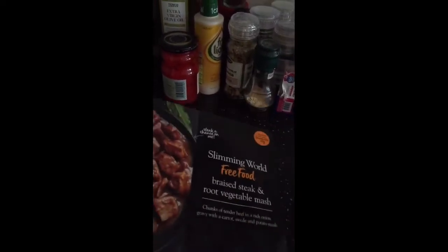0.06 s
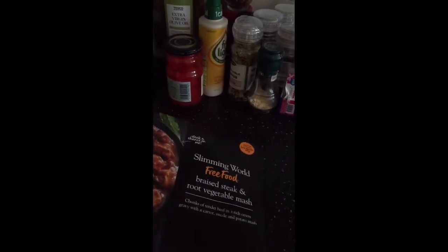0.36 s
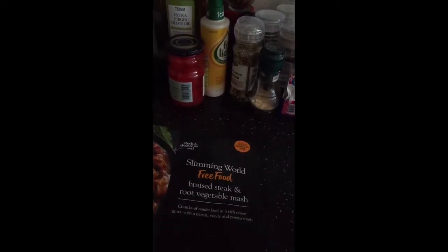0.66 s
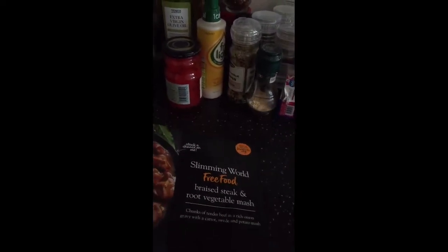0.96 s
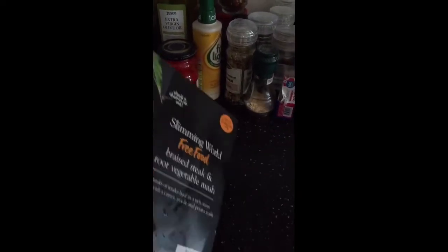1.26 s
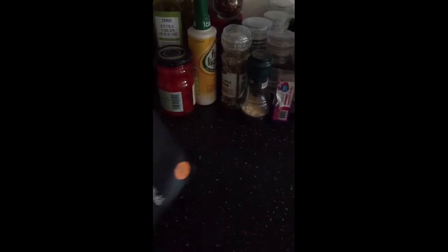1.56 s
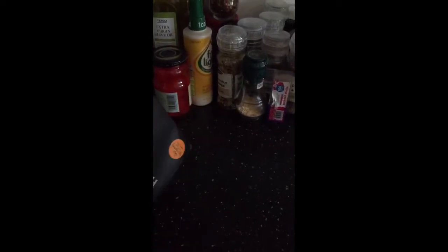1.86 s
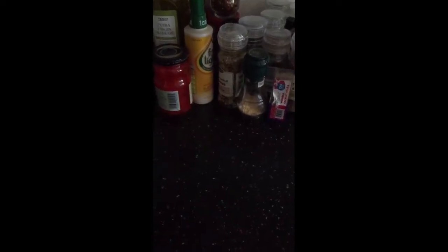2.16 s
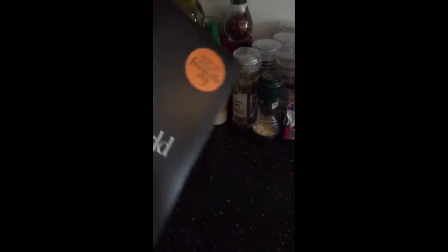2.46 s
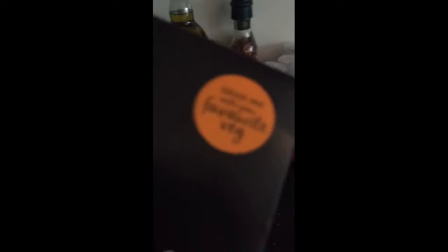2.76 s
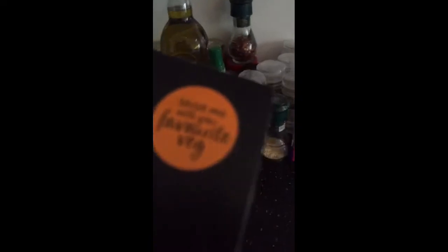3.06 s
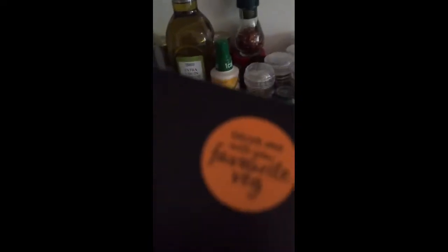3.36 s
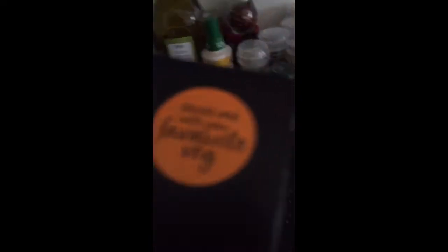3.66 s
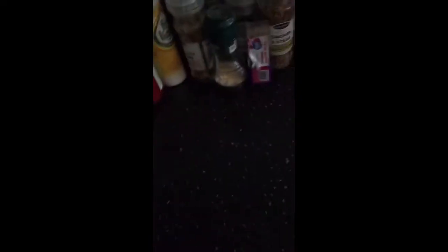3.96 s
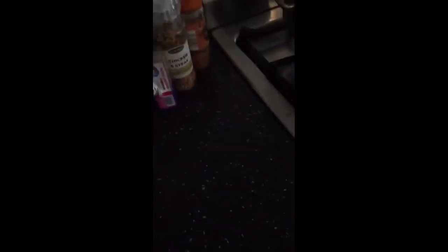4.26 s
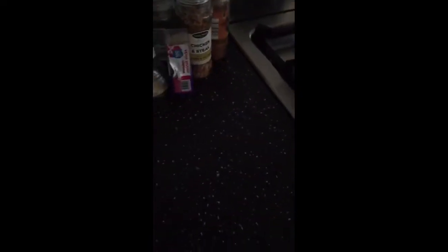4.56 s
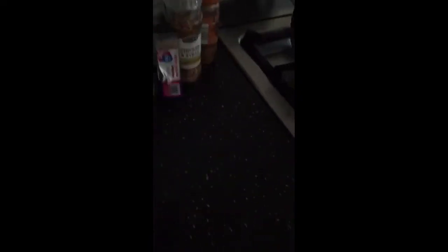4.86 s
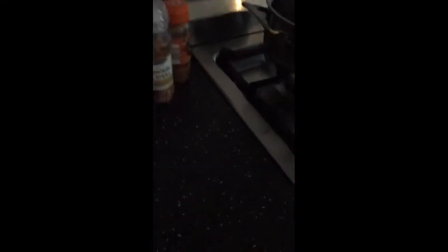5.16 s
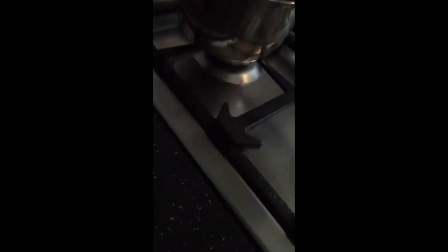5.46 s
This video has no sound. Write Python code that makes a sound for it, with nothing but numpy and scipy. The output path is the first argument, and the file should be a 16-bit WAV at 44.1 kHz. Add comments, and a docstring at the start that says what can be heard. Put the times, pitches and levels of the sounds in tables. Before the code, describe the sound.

Fingers rub and turn a ready meal in its cardboard sleeve, close to the microphone in a small kitchen. The card rustles softly while the plastic tray gives sharp snaps and crinkles. Clusters of light knocks and soft, hollow thuds follow as the box shifts in the hand. After a brief lull, the tray slides from the sleeve in one hissing scrape, with a few small bumps.

```python
"""Fingers rub and turn a ready meal in its cardboard sleeve, close by in a small kitchen.
The card catches and slips in tiny steps, which makes it rustle. Creases in the plastic tray
flip with a snap, tray and fingers knock on the card, and the box thuds softly in the hand.
At the end the packaging slides in one long hissing stroke. Short echoes and faint air lie behind."""
import sys
import numpy as np
from scipy import signal
from scipy.fft import rfft, irfft
from scipy.io import wavfile
from scipy.ndimage import map_coordinates

SR = 44100
rng = np.random.default_rng(int(sys.argv[2]) if len(sys.argv) > 2 else 0)


def store_pcm(level_fs):
    """Save levels as 16-bit WAV."""
    pcm = np.round(np.clip(level_fs, -1, 1) * 32767).astype(np.int16)
    wavfile.write(sys.argv[1], SR, np.atleast_2d(pcm).T)


N = 243431
T = np.arange(SR // 4) / SR   # seconds since a contact
HOLD_START_S, HOLD_LENGTH_S = 0.046, 3.954   # while the hand grips the box


# Finger strokes: t/s, length/s, rise time/s, level/dB, extra for hollow/dB, extra for grit/dB
FINGER_STROKES = [(0.035, 0.023, 0.014, -61, 6.5, -14), (0.188, 0.11, 0.022, -55.5, -4, -4.5),
                  (0.342, 0.043, 0.0073, -42, -10.5, -10), (0.401, 0.05, 0.0099, -45.5, -8, 3.5),
                  (0.524, 0.069, 0.047, -44, -2, 1), (0.455, 0.36, 0.045, -53.5, -10.5, 7),
                  (0.727, 0.041, 0.036, -38, -33, -7), (0.798, 0.093, 0.011, -56, -4.5, -1.5),
                  (0.953, 0.278, 0.23, -55, -6.5, -6), (1.631, 0.048, 0.024, -46, -3.5, 0.5),
                  (1.681, 0.043, 0.01, -55, -4, -6.5), (1.755, 0.098, 0.003, -56.5, -15, -3.5),
                  (1.877, 0.11, 0.031, -43, -0.5, -2), (2.004, 0.13, 0.009, -52.5, -11, -5),
                  (2.13, 0.034, 0.0037, -42, 3.5, -2), (2.169, 0.08, 0.02, -46.5, -6, -1.5),
                  (2.281, 0.042, 0.014, -46, 0.5, -5), (2.318, 0.093, 0.0045, -59, -3, -3.5),
                  (2.527, 0.065, 0.02, -58, -7.5, -14), (2.684, 0.3, 0.019, -80.5, -7, 7),
                  (3.092, 0.041, 0.031, -51, 14.5, -3), (3.21, 0.051, 0.0013, -43.5, 2.5, -4.5),
                  (3.166, 0.31, 0.011, -57, 6.5, -22), (3.459, 0.15, 0.029, -55.5, -1, -14),
                  (3.791, 0.2, 0.026, -69.5, 3, 9), (5.265, .11, .01, -63.5, 1.5, -2.5),
                  (5.376, 0.075, 0.035, -59, -4.5, -5)]

def rub_gains(grip_db=-72):
    """How hard the grip and the strokes drive the card, the hollow box and the gritty surface."""
    grip = from_db(grip_db) * stroke(HOLD_START_S, HOLD_LENGTH_S, attack_s=0.015)
    power = np.outer([1, 1, 0], grip ** 2)   # the grip alone stirs no grit
    for s, length_s, attack_s, db, hollow_db, grit_db in FINGER_STROKES:
        gains = from_db([db, db + hollow_db, db + grit_db])
        power += np.outer(gains ** 2, stroke(s, length_s, attack_s) ** 2)
    return np.sqrt(power)


# Tone of the card's flat panels, the hollow box and the gritty surface: f/Hz, level/dB
CARD_TONE = [(400, -28), (700, -15), (980, 6), (1150, -1.5), (1380, -1.5), (1700, -0.5), (2100, 0),
             (2600, -7.5), (3800, -12), (5200, -20.5), (15000, -49)]
HOLLOW_TONE = [(35, -35), (70, 4.5), (140, -4), (280, -1.5), (400, -6.5), (550, -6), (750, -2.5),
               (1200, -35.5), (3000, -53.5)]
GRIT_TONE = [(1000, -5.5), (2500, 10.5), (4200, 5), (6000, 3.5), (7500, -1.5), (10500, -4.5), (13000, -3),
             (16000, -9.5)]

def rubbing(card, hollow, grit):
    """Fingers and tray drag on the card, which sounds through its panels, hollow and rough face."""
    drag = slips(per_s=1700, spread_db=3.8, clump_db=2.6, clumps_per_s=110, smooth=.7)
    flex = slips(per_s=600, spread_db=3, clump_db=3, clumps_per_s=50, smooth=.6)
    panels = from_db(3) * card * colour(drag, CARD_TONE)
    return panels + hollow * colour(flex, HOLLOW_TONE) + grit * colour(drag, GRIT_TONE)


def lifted(x, start_s=0.5, length_s=0.95, bass_hz=130):
    """The bass of the rubbing comes in as the box leaves the worktop."""
    free = np.clip((np.arange(N) / SR - start_s) / length_s, 0, 1)
    resting = signal.lfilter(*signal.butter(2, bass_hz, "high", fs=SR), x)
    return free * x + (1 - free) * resting


# Sharp snaps, mostly creases of the tray flipping, some the crack of a knock on the card: t/s, level/dB, f/Hz,
# crumple (0 a clean flip, 1 a crunch)
SNAPS = [(0.208, -39, 6100, 0.27), (0.391, -33, 12600, 0.13), (0.436, -19.5, 2700, 0.77),
         (0.4696, -9.5, 11800, 0.045), (0.521, -35, 4400, .2), (0.5353, -21.5, 11300, 0.11),
         (.5750, -2, 3510, 0.081), (0.5837, -16.5, 12200, 0.19), (0.769, -25, 6150, .2),
         (0.8303, -25.5, 4430, 0.21), (1.054, -39.5, 2560, .3), (1.297, -40, 8800, 0.11),
         (1.8007, -23.5, 6900, 0.14), (1.953, -18.5, 2960, .15), (2.1195, -31, 5460, 0.088),
         (2.135, -28.5, 2200, .15), (2.2583, -19, 2260, 0.081), (2.778, -45.5, 3500, 0.71),
         (2.9513, -37, 2900, .25), (3.116, -30, 5750, 0.19), (3.1302, -22, 4070, 0.091),
         (3.2806, -25, 3100, 0.062), (3.419, -36, 2970, 0.098), (3.9852, -40.5, 5500, .5),
         (4.773, -34, 2480, 0.26)]

def snaps(creases, scatter_s=0.0052, ring_cycles=4.5):
    """A crease flips in one pulse, then crumples in small steps; the thin sheet rings lower."""
    out = np.zeros(N)
    for s, db, hz, crumple in creases:
        force = (T == 0) + crumple * rng.standard_normal(len(T)) * np.exp(-T / scatter_s)
        force = cut(force, "low", hz * 1.52)   # a larger crease takes longer to flip
        flip = np.diff(force, prepend=0)
        crease = ring(flip, min(hz, 15000), fade_s=ring_cycles / hz)
        sheet = from_db(-9) * ring(flip, hz * .6, fade_s=0.0021)
        pulse = cut(crease + sheet, "low", hz * 8.1 * from_db(0.26 * db))   # weak snaps are duller
        add(out, s, from_db(db) * peak_one(pulse))
    return out


def crinkles(grit, per_s=4.6, over_grit_db=16, middle_hz=5000, crumple=0.28):
    """List small snaps at random moments, as strong as the rubbing that sets them off."""
    count = round(per_s * HOLD_LENGTH_S)
    s = HOLD_START_S + HOLD_LENGTH_S * rng.random(count)
    db = 20 * np.log10(grit[(s * SR).astype(int)] + 1e-9) + over_grit_db
    hz = middle_hz * 2 ** rng.uniform(-1, 1, count)
    return list(zip(s, db, hz, np.full(count, crumple)))


def jolts(middle_hz=1310, rattle_s=0.00081, thump_db=-21):
    """List a light knock for each snap; the card gives way, so it grows less than the snap."""
    return [(s, -32.5 + 0.35 * db, middle_hz * 2 ** rng.uniform(-.25, .25), rattle_s, thump_db)
            for s, db, _, _ in SNAPS]


# Tray and fingers hit the card: t/s, level/dB, f/Hz, rattle time/s, extra for the box's thump/dB
CARD_KNOCKS = [(0.034, -41, 1040, 0.0023, -0.5), (0.788, -40, 1110, 0.00088, -19),
               (1.168, -41, 1125, 0.0076, -27), (1.446, -44, 1375, 0.0074, -13),
               (1.651, -34.5, 1006, 0.0024, 4), (1.956, -21, 1210, 0.0065, -3),
               (2.033, -23, 1160, 0.00066, -35), (2.1020, -34.5, 1056, 0.0074, -1),
               (2.1465, -21, 1224, 0.004, -9.5), (2.1692, -19.5, 1144, 0.0028, -13),
               (2.2235, -27, 1080, 0.002, -3), (2.258, -23, 1440, 0.00094, -26),
               (2.616, -41, 1740, 0.00049, -45), (2.704, -44.5, 1533, 0.003, -13),
               (3.119, -30.5, 1190, 0.0024, -5.5), (3.133, -24.5, 1535, 0.0026, -2.5),
               (3.281, -29, 915, 0.001, -10), (3.831, -46.5, 1393, 0.003, -6),
               (3.990, -35, 835, 0.0033, -11), (4.711, -48.5, 1000, 0.0022, 0.5),
               (4.7755, -29, 897, 0.0068, -13.5), (4.821, -37.5, 940, 0.0051, -15),
               (5.235, -32.5, 1234, 0.0058, -35)]
# Notes of a card panel: multiple of the knock's pitch, level/dB, time to fade by 60 dB/s
PANEL_NOTES = [(.8, -3.5, 0.031), (0.998, 3, .021), (1.18, 0.5, 0.012), (1.38, -6, 0.016),
               (1.898, -9, 0.013), (2.499, -10, 0.0093)]

def knocks(blows, lead_s=.02, rattle=0.29, detune=.03, uneven_db=1.5):
    """Surfaces scuff, hit and rattle; the grip shifts the panel's notes from blow to blow."""
    out, t = np.zeros(N), T - lead_s
    for s, db, hz, rattle_s, _ in blows:
        force = rattle * rng.standard_normal(len(t)) * np.exp(-abs(t) / rattle_s)
        force[round(lead_s * SR)] += 1   # the hit itself
        panel = 0
        for ratio, level, fade_s in PANEL_NOTES:
            note = ring(force, hz * ratio * np.exp(detune * rng.normal()), fade_s)
            panel += note * from_db(level + uneven_db * rng.normal())
        panel = cut(panel, "low", hz * 3)   # card gives way, so the contact is soft
        panel = cut(panel, "high", hz * 0.79)   # a small panel gives off little bass
        crack = from_db(-26) * peak_one(colour(force, GRIT_TONE))
        add(out, s - lead_s, from_db(db) * (peak_one(panel) + crack))
    return out


# Soft bumps of the box in the hand: t/s, level/dB, f/Hz
HAND_BUMPS = [(0.285, -39, 333), (0.392, -40.5, 292), (1.975, -36, 258), (2.15, -30, 108),
              (2.768, -30, 109), (2.93, -43.5, 105), (3.13, -24.5, 97), (3.215, -26, 88.5),
              (3.286, -33, 76.6), (3.441, -40, 110), (3.831, -35.5, 83), (3.883, -38, 125),
              (3.988, -41.5, 86.6), (4.707, -40, 98), (4.939, -36.5, 540), (5.089, -38, 158),
              (5.202, -37.5, 72), (5.295, -47.5, 80), (5.361, -41, 540), (5.39, -42, 169)]
# Notes of the whole box: multiple of the bump's pitch, level/dB, swell and fade time/cycles
BOX_NOTES = [(0.621, -4.5, 0.97), (1.001, 10, 0.49), (1.648, -3, 0.82), (2.8, -9.5, 1)]

def thuds(blows, thump_hz=276, spread_octaves=0.23):
    """Each bump or knock pushes the whole box, which swings for just a few cycles."""
    out = np.zeros(N)
    thumps = [(s, db + thump_db, thump_hz * 2 ** (spread_octaves * rng.uniform(-1, 1)))
              for s, db, _, _, thump_db in blows]
    for s, db, hz in HAND_BUMPS + thumps:
        body = 0
        for ratio, level, cycles in BOX_NOTES:
            turns = T * hz * ratio
            swell = turns / cycles * np.exp(-turns / cycles)
            body -= from_db(level) * swell * np.sin(2 * np.pi * turns)
        body = cut(body, "high", hz * 0.42)   # the light box hardly sounds below its main pitch
        add(out, s, from_db(db) * peak_one(body))
    return out


# A card edge skims along with a bright hiss: t/s, length/s, rise time/s, level/dB
EDGE_SKIMS = [(1.401, 0.031, 0.017, -54.5), (1.535, 0.031, 0.022, -60), (3.765, 0.16, 0.047, -61),
              (5.15, 0.07, 0.032, -38)]
# Tone of the slide's scrape and of its fine hiss: f/Hz, level/dB
SCRAPE_TONE = [(300, -51), (600, -7), (900, 2), (1350, 5.5), (1700, 5), (2200, 1.5), (3200, -0.5),
               (4500, -2), (7000, -12.5), (12000, -35)]
HISS_TONE = [(2000, 3.1), (4500, 4.1), (6400, 10.3), (8000, 4.9), (9100, 7.7), (9500, 11.5), (10100, 3.5),
             (12800, 7.4), (16000, 1.7)]

def sliding(start_s=4.797, length_s=0.415, speed_up_s=0.052, stop_s=0.014):
    """The tray slides until it comes free: coarse slips shake the card, fine slips and skims hiss."""
    t = np.maximum(np.arange(N) / SR - start_s, 0)
    speed = (1 - np.exp(-t / speed_up_s)) * np.exp(-np.maximum(t - length_s, 0) / stop_s)
    skims = sum(from_db(db) * stroke(s, skim_s, rise_s, stop_s) for s, skim_s, rise_s, db in EDGE_SKIMS)
    coarse = slips(per_s=5000, spread_db=2.5, clump_db=1.3, clumps_per_s=120, smooth=.9)
    fine = slips(per_s=9000, spread_db=3, clump_db=1.1, clumps_per_s=200, smooth=.9)
    scrape = from_db(-42.5) * speed * colour(coarse, SCRAPE_TONE)
    hollow = from_db(-53) * speed ** 0.5 * colour(coarse, HOLLOW_TONE)
    hiss = np.hypot(from_db(-45.5) * speed ** 5.4, skims) * colour(fine, HISS_TONE)
    return scrape + hollow + hiss


# A touch travels along a panel: t/s, length/s, level/dB, first f/Hz, last f/Hz
PANEL_SWISHES = [(0.744, 0.025, -45, 1900, 1190), (1.202, 0.018, -45, 1090, 1100),
                 (3.283, 0.033, -46, 415, 726), (4.851, 0.3, -51.5, 1180, 683),
                 (4.914, 0.237, -48.5, 2680, 1850), (5.227, 0.0098, -42.5, 2540, 2550)]

def swishes(notes=12, sharpness=17.8, attack_s=0.0089):
    """A smooth rub wakes neighbouring notes of a panel, one after another."""
    out, t = np.zeros(N), np.arange(SR // 2) / SR
    for s, length_s, db, first_hz, last_hz in PANEL_SWISHES:
        place = np.clip(t / length_s, 0, 1) * (notes - 1)
        hiss = rng.standard_normal(len(t))
        sound = 0
        for k, hz in enumerate(np.geomspace(first_hz, last_hz, notes)):
            note = rms_one(signal.lfilter(*signal.iirpeak(hz, sharpness, SR), hiss))
            sound += np.maximum(1 - abs(place - k), 0) * note
        add(out, s, from_db(db) * sound * stroke(0, length_s, attack_s)[:len(t)])
    return out


# A fingertip glides over the sleeve: t/s, length/s, level/dB, first f/Hz, last f/Hz
FINGER_GLIDES = [(0.07, 0.19, -60, 2152, 2085), (1.33, 0.058, -53.5, 2115, 2180),
                 (1.54, 0.076, -50.5, 2066, 2144), (3.313, 0.069, -54.5, 2260, 3025),
                 (3.454, 0.14, -50, 2343, 2055), (3.725, 0.08, -63, 1928, 2284)]
# Tone of the bent sleeve: multiple of its main pitch, level/dB
SLEEVE_TONE = [(.2, -23.5), (.45, -6.5), (.86, -8.5), (1, 5.5), (1.14, -8), (1.9, -11), (2.5, -23.5),
               (3.1, -17.5), (3.6, -25.5), (6, -23.5)]

def glides(base_hz=2200, attack_s=0.016):
    """Fine, even rubbing sounds through the sleeve, whose notes all shift together as it bends."""
    out, t = np.zeros(N), np.arange(SR // 2) / SR
    force = slips(per_s=6000, spread_db=3, clump_db=1, clumps_per_s=150, smooth=.8)
    hiss = colour(force, [(ratio * base_hz, db) for ratio, db in SLEEVE_TONE])
    for s, length_s, db, first_hz, last_hz in FINGER_GLIDES:
        rate = np.interp(t, [0, length_s], [first_hz, last_hz]) / base_hz
        bent = map_coordinates(hiss, [s * SR + np.cumsum(rate)], order=3)   # faster sounds higher
        add(out, s, from_db(db) * bent * stroke(0, length_s, attack_s)[:len(t)])
    return out


def near_surfaces(x, bounce=.23, sway=.1):
    """Worktop, hand and box send back very quick echoes, whose delays wander as the pack moves."""
    out = x
    for delay_s in (.0012, .0019, .0029, .0043):
        lag = delay_s * SR * np.exp(sway * drift(per_s=6))
        out = out - bounce * map_coordinates(x, [np.arange(N) - lag], order=3)
    return out


def kitchen_echo(x, level_db=-16, first_s=0.0055, fade_s=.27):
    """Many short echoes come off tiles and cupboards."""
    t = np.arange(SR // 2) / SR
    build_up = np.clip(t / first_s - 1, 0, 1)
    tail = rng.standard_normal(len(t)) * from_db(-60 * t / fade_s) * build_up
    return from_db(level_db) * signal.fftconvolve(x, tail / np.linalg.norm(tail))[:N]


# Tone of the still kitchen air: f/Hz, level/dB
AIR_TONE = [(25, -27.5), (40, -14), (50, 4.5), (75, -8), (155, -8), (700, -23), (2200, -23.5),
            (16000, -37.5)]

def kitchen_air(level_db=-66):
    """The still room gives a faint, low rush."""
    return from_db(level_db) * colour(rng.standard_normal(N), AIR_TONE)


def slips(per_s, spread_db, clump_db, clumps_per_s, smooth):
    """Friction: tiny slips of uneven size that come in clumps, over a smooth hiss."""
    sizes = from_db(spread_db * np.minimum(rng.exponential(1, N), 4)) * rng.choice([-1, 1], N)
    grains = rms_one(sizes * (rng.random(N) < per_s / SR))
    hiss = smooth * rng.standard_normal(N)
    return rms_one((grains + hiss) * from_db(clump_db * drift(clumps_per_s)))


def stroke(start_s, length_s, attack_s, release_s=0.011):
    """Speed of a movement: it rises, holds and dies away."""
    t = np.arange(N) / SR - start_s
    return np.clip(t / attack_s, 0, 1) * np.exp(-np.maximum(t - length_s, 0) / release_s)


def drift(per_s):
    """A value that wanders at random around zero."""
    knots = rng.standard_normal(N // 20)
    return np.interp(np.arange(N) * per_s / SR, np.arange(len(knots)), knots)


def ring(x, hz, fade_s):
    """Each push starts a note that fades by 60 dB in fade_s."""
    decay, angle = from_db(-60 / (fade_s * SR)), 2 * np.pi * hz / SR
    return signal.lfilter([0, np.sin(angle)], [1, -2 * decay * np.cos(angle), decay ** 2], x + 1e-18)


def colour(x, tone, size=4096):
    """Give a sound the tone listed in a table."""
    hz, db = np.transpose(tone)
    grid = np.maximum(np.arange(size // 2 + 1), .5) * SR / size
    cepstrum = irfft(np.log(from_db(np.interp(np.log(grid), np.log(hz), db))))
    cepstrum[1:size // 2] *= 2   # folded so that nothing rings before its cause
    cepstrum[size // 2 + 1:] = 0
    response = irfft(np.exp(rfft(cepstrum)))
    return signal.fftconvolve(x, response / np.linalg.norm(response))[:len(x)]


def cut(x, keep, hz):
    """Keep the "low" or "high" side of hz and soften the rest."""
    return signal.sosfilt(signal.butter(2, min(hz, .45 * SR), keep, fs=SR, output="sos"), x)


def from_db(db):
    """Decibels to gain."""
    return 10 ** (np.asarray(db) / 20)


def rms_one(x):
    """Scale to an average power of 1."""
    return x / np.sqrt(np.mean(x ** 2) + 1e-20)


def peak_one(x):
    """Scale to a height of 1."""
    return x / np.max(np.abs(x))


def add(out, s, sound):
    """Mix a sound in at its moment."""
    at = max(round(s * SR), 0)
    out[at:at + len(sound)] += sound[:N - at]


def scene():
    """The packaging close by, its echoes and the still room."""
    card, hollow, grit = rub_gains()
    box = near_surfaces(lifted(rubbing(card, hollow, grit)) + sliding() + swishes() + glides())
    blows = CARD_KNOCKS + jolts()
    box += from_db(4) * knocks(blows)
    box += from_db(-1) * snaps(SNAPS + crinkles(grit))
    box += from_db(3.84) * thuds(blows)
    return (box + kitchen_echo(box) + kitchen_air())[None]


def record(dry, bass_hz=40, top_hz=15800):
    """The microphone drops the deep bass; the highest treble is cut."""
    thin = signal.sosfilt(signal.butter(4, bass_hz, "high", fs=SR, output="sos"), dry)
    return signal.sosfilt(signal.ellip(10, .1, 70, top_hz, fs=SR, output="sos"), thin)


dry = scene()
out = record(dry)
store_pcm(out)
```